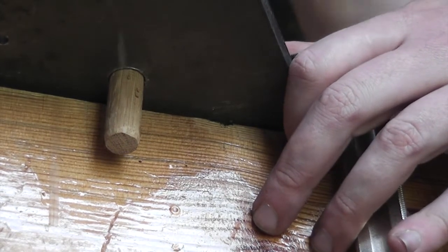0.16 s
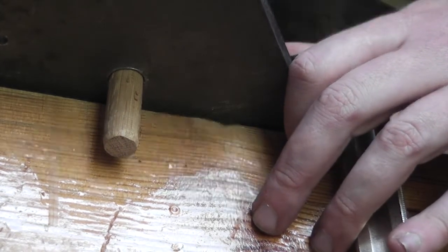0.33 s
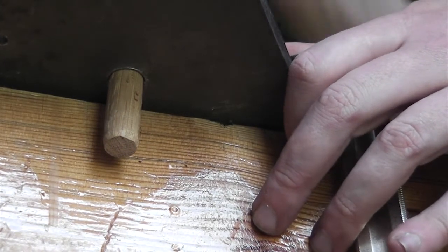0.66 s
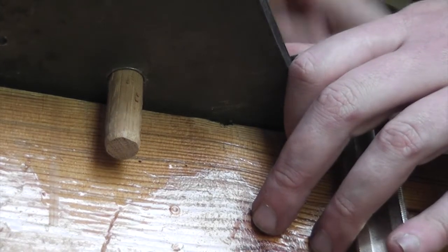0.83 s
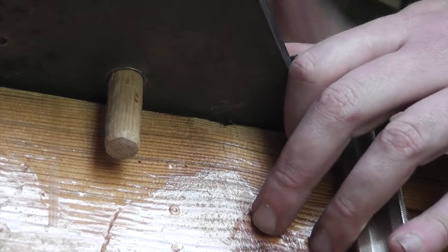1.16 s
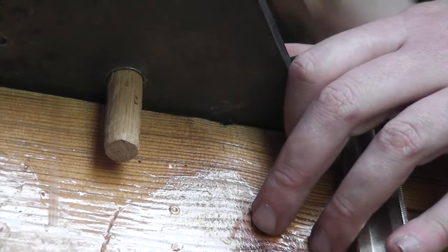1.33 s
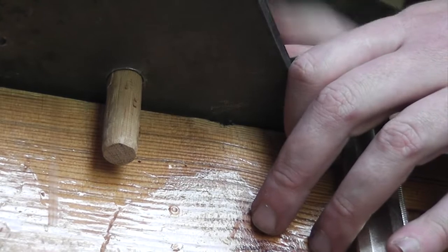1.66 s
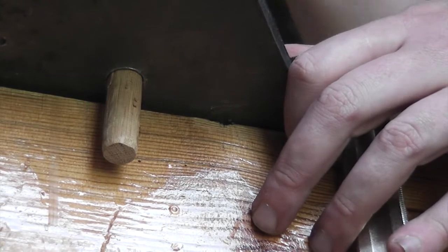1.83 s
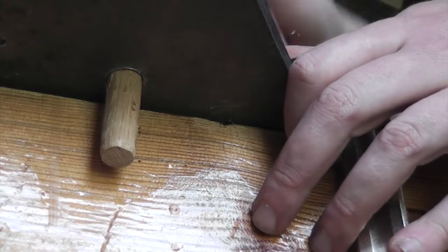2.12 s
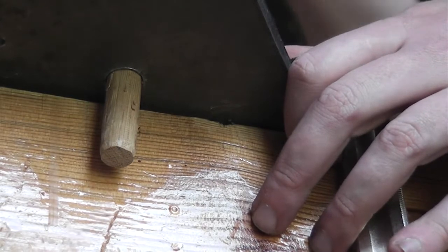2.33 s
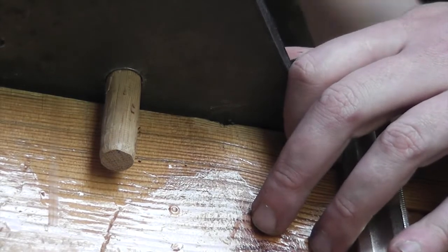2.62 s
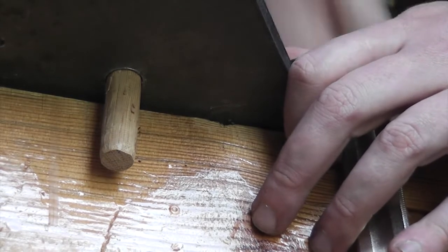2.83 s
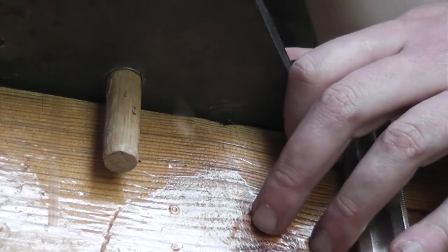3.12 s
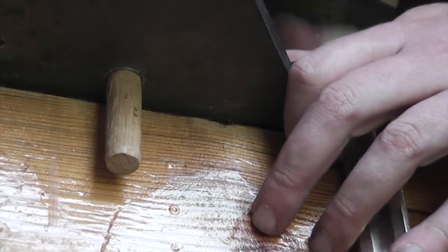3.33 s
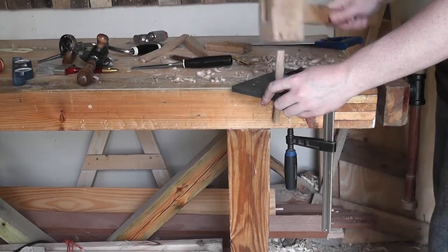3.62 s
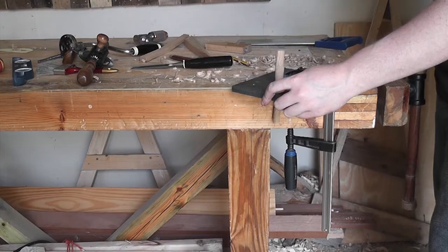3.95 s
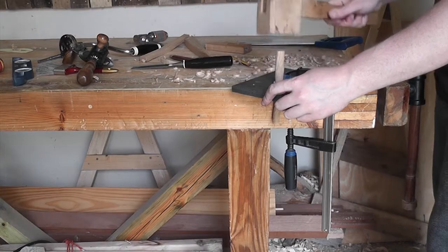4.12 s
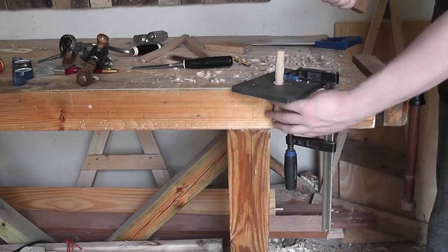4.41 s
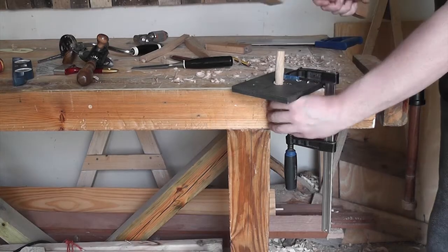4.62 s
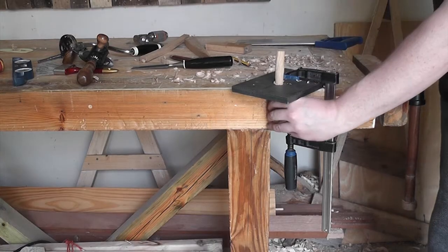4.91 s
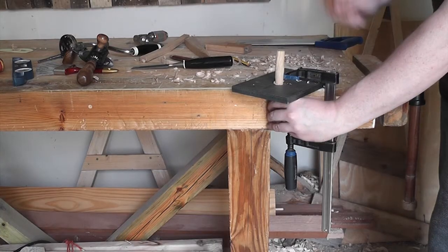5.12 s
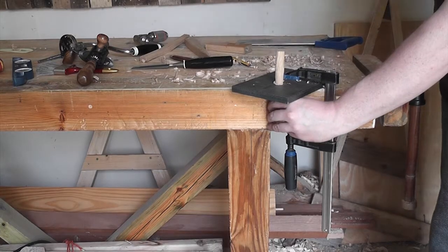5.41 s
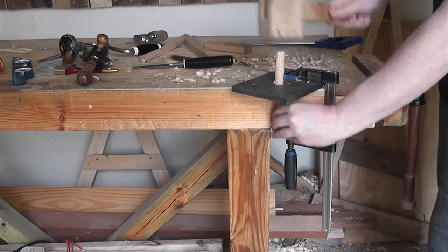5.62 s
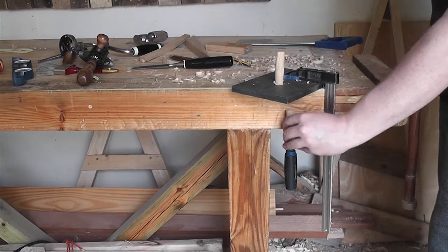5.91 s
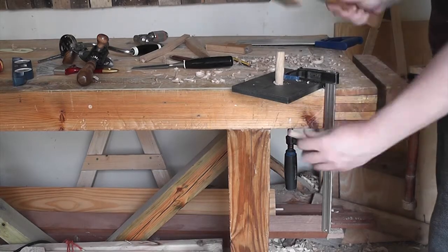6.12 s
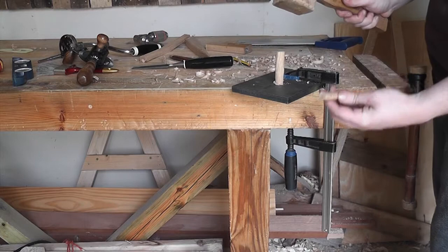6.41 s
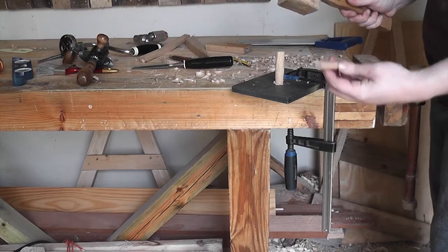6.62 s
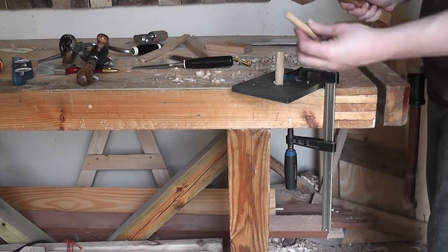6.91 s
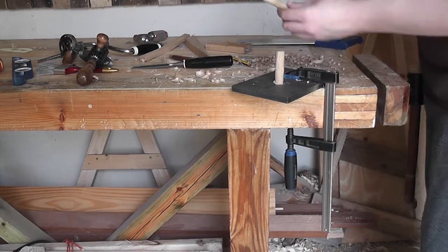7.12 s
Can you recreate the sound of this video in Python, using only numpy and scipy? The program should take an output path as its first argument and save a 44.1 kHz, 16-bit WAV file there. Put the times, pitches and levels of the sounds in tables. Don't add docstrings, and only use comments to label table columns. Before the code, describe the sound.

Close to the bench, a wooden mallet hits a peg through a steel plate about every 0.43 seconds: sharp fibre crack, metallic ping, low bench thump, short boxy room tail. Midway the sound jumps to a farther, roomier position for two bright blows, then a pause with small ticks and handling, two more blows with the steel damped by a hand, and soft rustles over faint traffic hum.

```python
import sys
import numpy as np
from scipy import signal
from scipy.fft import rfft, irfft, next_fast_len
from scipy.io import wavfile

SR = 44100
rng = np.random.default_rng(int(sys.argv[2]) if len(sys.argv) > 2 else 0)


def boost(x):
    u = np.asarray(x, float) / 20
    return 10 ** u


def file_out(sig):
    cols = np.atleast_2d(sig).T
    lim = np.clip(cols, -1, 1)
    pcm = np.round(lim * 32767).astype(np.int16)
    wavfile.write(sys.argv[1], SR, pcm)


N = 320607
LEAD = SR // 10
CHANGE_S = 3.479
NEAR_EARLIER_S, FAR_EARLIER_S = -0.055, 3.17


def rms_one(x):
    return x / np.sqrt(np.mean(x ** 2) + 1e-20)


def at_hz(points, hz):
    table_hz, value = np.transpose(points)
    return np.interp(np.log(hz), np.log(table_hz), value)


def ring(clicks, hz, t60):
    radius = boost(-60 / (t60 * SR))
    angle = 2 * np.pi * hz / SR
    return signal.lfilter([0, np.sin(angle)], [1, -2 * radius * np.cos(angle), radius ** 2], clicks + 1e-18)


def stereo_noise(size, spectrum, likeness):
    hz = np.arange(1, size // 2 + 2) * SR / size
    alike = np.clip(at_hz(likeness, hz), 0, 1)
    mid, side = rfft(rng.standard_normal((2, size))) * boost(at_hz(spectrum, hz))
    return hz, np.sqrt(1 + alike) * mid + np.sqrt(1 - alike) * side * [[1], [-1]]


HOLD_S, CREEP_DB_S = 0.31, 15.5
PULL_SHARE = 0.46


def gain_corners(start_s, gain_db, pulls):
    corners = [(start_s, gain_db)]
    free_s = start_s + HOLD_S
    for s, bottom_db in pulls:
        full_s = free_s - gain_db / CREEP_DB_S
        before_db = min(gain_db + CREEP_DB_S * max(s - free_s, 0), 0)
        corners += [(min(free_s, s), gain_db), (min(full_s, s), before_db), (s, before_db)]
        gain_db = before_db - PULL_SHARE * (before_db - bottom_db)
        free_s = s + HOLD_S
    return np.interp(np.arange(N) / SR, *np.transpose(corners))


def slow_gain():
    end = [(N / SR, 0)]
    near_pulls = [(row[0], -23.5) for row in NEAR_BLOWS]
    far_pulls = [(row[0], -19) for row in FAR_BLOWS]
    last_far_pulls = [(row[0], -13.5) for row in LAST_FAR_BLOWS]
    near = gain_corners(NEAR_EARLIER_S, -15, near_pulls + end)
    far = gain_corners(FAR_EARLIER_S, -13.5, far_pulls + last_far_pulls + end)
    return np.where(np.arange(N) / SR < CHANGE_S, near, far)


def building_rumble():
    t = np.arange(N) / SR
    near = [NEAR_EARLIER_S] + [row[0] for row in NEAR_BLOWS]
    far = [FAR_EARLIER_S] + [row[0] for row in FAR_BLOWS + LAST_FAR_BLOWS]

    def latest(s):
        return np.array(s)[np.maximum(np.searchsorted(s, t) - 1, 0)]
    since_s = t - np.where(t < CHANGE_S, latest(near), latest(far))
    return boost(-39.5 - 60 * since_s / 0.58)


# frequency in Hz, level in dB per Hz.
HUM = [(18, -45), (30, -4.5), (52, -7.5), (93, 1.5), (125, -4), (202, -1), (417, -6.5), (900, -4),
       (2470, -17), (5660, -21.5), (10600, -31.5), (12000, -29.5), (15600, -40), (22000, -120)]
# frequency in Hz, left-right likeness from 0 to 1.
HUM_LIKENESS = [(60, 0.57), (170, 1), (500, 0.83), (1000, 0.83), (1800, 1), (12300, 1)]


def ambience():
    gain_db = slow_gain()
    size = next_fast_len(N)
    hz, pair = stereo_noise(size, HUM, HUM_LIKENESS)
    pair = pair * boost([[-0.7], [0.7]])
    low_share = 1 / (1 + (hz / 2200) ** 3)
    traffic = rms_one(irfft(pair * low_share, size)[:, :N])
    hiss = rms_one(irfft(pair * (1 - low_share), size)[:, :N])
    return (boost(-43.5 + gain_db) + building_rumble()) * traffic + boost(-53 + 1.27 * gain_db) * hiss


# start in seconds, level in dB, centre in Hz,
# bandwidth in Hz, decay length in seconds.
SMALL_SOUNDS = [(.223, -66, 9360, 2022, .003), (0.527, -47, 6000, 7000, 0.027),
                (1.062, -61, 8850, 1500, .004), (1.519, -70, 9770, 1000, 0.0027),
                (1.563, -75, 10700, 1490, .003), (4.063, -42.5, 553, 800, 0.0051),
                (4.453, -62.5, 6000, 450, 0.04), (4.452, -65.5, 8500, 5030, .006),
                (4.67, -59.5, 6060, 498, 0.014), (4.742, -58, 7500, 8000, 0.015),
                (4.693, -65.5, 2700, 160, 0.24), (4.754, -54, 2370, 300, 0.02),
                (4.939, -48.5, 2980, 1200, 0.07), (5.967, -60, 10500, 3000, .004),
                (6.317, -50.5, 6000, 1500, 0.054), (6.5, -47, 5500, 3000, 0.016)]


def small_sounds():
    out = np.zeros(N)
    t = np.arange(LEAD * 2) / SR
    for s, level_db, hz, width_hz, length_s in SMALL_SOUNDS:
        edges = np.clip([hz - width_hz / 2, hz + width_hz / 2], 100, 15000)
        resonance = signal.butter(2, edges, "band", fs=SR, output="sos")
        puff = rms_one(signal.sosfilt(resonance, rng.standard_normal(len(t))))
        rise_s = 0.00092 + 0.083 * length_s
        start = round(s * SR)
        out[start:start + len(t)] += boost(level_db) * puff * np.exp(-t / length_s) * (1 - np.exp(-t / rise_s))
    return out


def mode_tail(modes, t, build_s, longest_s):
    out = 0
    for hz, level_db, t60 in modes:
        phase = rng.uniform(0, 2 * np.pi) + rng.normal(0, 0.15, (2, 1))
        decay = boost(level_db - 60 * t / min(t60, longest_s))
        out = out + decay * np.sin(2 * np.pi * hz * t + phase)
    return rms_one(out * (1 - np.exp(-t / build_s)))


# frequency in Hz, t60 in seconds.
ROOM_T60 = [(60, 0.33), (190, .25), (320, 0.33), (600, 0.29), (1500, 0.31), (4000, 0.29), (10000, 0.23)]
# frequency in Hz, rise time in seconds.
ROOM_RISE = [(200, 0.00043), (350, 0.0098), (600, 0.033), (1000, 0.015), (2000, 0.0039), (5000, 0.00061)]
# frequency in Hz, left-right likeness from 0 to 1.
ROOM_LIKENESS = [(60, 0.95), (170, 1), (500, 0.73), (2000, 0.8), (2900, 1), (4100, 0.98), (4900, .9995),
                 (11500, 0.97)]


def diffuse_room(spectrum, t):
    hz, pair = stereo_noise(len(t), spectrum, ROOM_LIKENESS)
    out = 0
    for centre in 28 * 2 ** np.arange(0, 9.1, 0.5):
        overlap = np.clip(1 - 2 * np.abs(np.log2(hz / centre)), 0, 1)
        build = 1 - np.exp(-t / at_hz(ROOM_RISE, centre))
        decay = boost(-60 * t / at_hz(ROOM_T60, centre))
        out = out + build * decay * irfft(pair * overlap, len(t))
    return rms_one(out)


# frequency in Hz, level in dB per Hz.
NEAR_ROOM = [(30, -43), (55, -31), (95, -16), (150, -18.5), (215, -10.5), (300, -8), (520, -4.5),
             (750, -7.5), (1200, -14.5), (2500, -22), (4100, -22.5), (8700, -28), (12000, -38.5),
             (15600, -66.5)]
FAR_ROOM = [(30, -62), (55, -45.5), (130, -20), (250, -9.5), (330, -10.5), (520, -1.5), (750, -3.5),
            (1100, -13.5), (1800, -15), (2500, -26), (3800, -17), (6000, -20), (12000, -38), (15600, -75.5)]
# frequency in Hz, level in dB, t60 in seconds.
NEAR_LOWS = [(167.5, -9.5, 0.23), (290, -8, 0.11), (322, 1.5, 0.28), (452.8, -2.5, 0.2), (510, -4.5, 0.3),
             (574.5, -4.5, 0.19), (392.6, -3.5, 0.21), (695, -1.5, .25), (624, 3.5, 0.21),
             (854, -9.5, 0.14), (829, 1, 0.18), (979, -3.5, 0.22), (1039, -34, 0.15)]
FAR_LOWS = [(147.2, -15, 0.28), (259, -4, 0.336), (379.4, -0.5, 1.5), (513.4, -1, 0.34), (644, -6, 0.3),
            (405.6, -2.5, .3), (576, -2, 0.3), (344.3, -5.5, 0.42), (1002, -9.5, 0.34), (1061, -18.5, 0.79)]
# frequency in Hz, level in dB, t60 in seconds.
NEAR_HIGHS = [(1565, 3, .3), (1870, -8, .3), (2120, -5, .3), (2617, -8, .3), (3840, -8, .25),
              (4135, -4, .22), (4660, -7, .25), (5960, -11, .25), (6820, -10, .25), (8580, -13, .2),
              (9640, -12, .15)]
FAR_HIGHS = [(1940, -6, .3), (2617, -8, .35), (3600, 0, .35), (4090, 5, .4), (4690, -3, .3),
             (5200, -6, .28), (5900, -3, .25), (8550, -10, .2), (9700, -14, .2)]


def room_answer(spectrum, lows, highs, lows_db, highs_db):
    t = np.arange(2 ** 15) / SR
    low_modes = boost(lows_db) * mode_tail(lows, t, build_s=0.02, longest_s=0.35)
    high_modes = boost(highs_db) * mode_tail(highs, t, build_s=0.00053, longest_s=0.29)
    return (diffuse_room(spectrum, t) + low_modes + high_modes) / np.sqrt(len(t))


# frequency in Hz, level in dB, t60 in seconds.
THUMP = [(70, -8, 0.011), (120, -4.5, 0.026), (194, -2.5, 0.057)]


def bench_thump(train, thump_db):
    thump = 0
    for hz, level_db, t60 in THUMP:
        thump = thump + ring(train(thump_db + level_db, round(0.00091 * SR)), hz, t60)
    right = boost(1.4) * np.roll(thump, round(0.0025 * SR))
    return -np.array([thump, right])


# frequency in Hz, level in dB, t60 in seconds.
NEAR_STEEL = [(705, -48, 3), (1367, -60, 3), (1453, -63, 3), (1658, -65, 1.5), (490, -56, 1.5)]
FAR_STEEL = [(1367, -50, 4), (1453, -51, 4), (2584, -60, 1.5)]


def steel_ring(train, steel, steel_db):
    return sum(ring(train(level_db + steel_db), hz, t60) for hz, level_db, t60 in steel)


# frequency in Hz, level in dB, t60 in seconds.
NEAR_BODY = [(1636, -10.5, .025), (800, -9, 0.016), (2700, -14, 0.0027), (3320, -13, 0.012),
             (4810, -8, 0.008), (6000, -19.5, .015), (6760, -15, 0.018), (8860, -14.5, 0.013),
             (12700, -11.5, 0.00095)]
FAR_BODY = [(1000, -5, 0.015), (2120, -13.5, 0.09), (3440, -12, 0.011), (4830, -14, 0.026),
            (6000, -5, 0.0072), (8960, -9.5, 0.0034), (9600, -19.5, 0.0047), (10250, -2.5, 0.003)]


def body_modes(train, crack, body, count):
    out = 0
    for k, (hz, level_db, t60) in enumerate(body):
        lag = np.abs(30 * rng.standard_normal(count)).astype(int)
        shock = train(level_db + 0.7 * rng.standard_normal(count), lag)
        out = out + ring(shock + boost(level_db - 19.5) * crack, hz, t60) * (-1) ** k
    return out


def plate_ping(train, ping_db):
    ping_hz = 4105
    contact = np.hanning(90) * np.sin(2 * np.pi * ping_hz * np.arange(90) / SR) / 22
    ping = ring(np.convolve(train(ping_db), contact)[:N + LEAD], ping_hz, 0.024)
    return ping + ring(train(ping_db - 17), 4096, 0.13)


def fibre_crack(at, gains):
    t = np.arange(250) / SR
    swell = np.exp(-t / 0.0011) * (1 - np.exp(-t / 0.00044))
    crack = np.zeros(N + LEAD)
    for i, gain in zip(at, gains):
        crack[i:i + 250] += gain * swell * rng.standard_normal(250)
    return crack


# start in seconds, strength in dB, treble crack in dB, bench thump in dB, long steel ring in dB.
NEAR_BLOWS = [
    (0.369, -5, -15, -28, -6),
    (0.797, -4, -18.5, -29, -3),
    (1.226, -3, -18.5, -35, -9),
    (1.652, -4, -18.5, -29.5, 2),
    (2.069, -4, -16.5, -28, -8),
    (2.491, -6, -14.5, -27, -3),
    (2.926, -6, -15, -27.5, -7),
    (3.35, -4.5, -15, -30.5, -2),
]
FAR_BLOWS = [
    (3.644, -8, -11.5, -26.5, -3),
    (4.092, -7.5, -13, -34.5, -16),
]
LAST_FAR_BLOWS = [
    (5.201, -4.5, -18.5, -36, -6),
    (5.635, -5.5, -13, -37.5, -11),
]


def mallet_blows(rows, body, steel, room, room_db, echo_db, ping_db, thump_db, bounce_s, bounce_db):
    s, strength_db, crack_db, bench_db, steel_db = np.transpose(rows)
    treble_db = crack_db - np.median(crack_db)
    bench_db = bench_db - np.median(bench_db)
    more_ping_db = -1.6 * (strength_db - np.median(strength_db))
    at = np.round((s + 0.00056) * SR).astype(int) + LEAD

    def train(db, lag=0):
        clicks = np.zeros(N + LEAD)
        clicks[at + lag] = boost(strength_db + db)
        return clicks

    def soften(clicks):
        return signal.lfilter([0.3], [1, -0.7], clicks)

    crack = fibre_crack(at, boost(strength_db + treble_db))
    ping = plate_ping(train, ping_db + more_ping_db)
    direct = ping + body_modes(train, crack, body, len(rows)) + boost(-4.5) * crack
    direct = direct + boost(bounce_db) * np.roll(direct, round(bounce_s * SR))
    direct = direct * boost([[0.33], [-0.33]])
    treble = train(treble_db) - soften(train(treble_db))
    feed = boost(room_db) * (soften(train(0)) + treble + boost(-21) * crack) + boost(echo_db) * ping
    wet = signal.oaconvolve(feed[None], room, axes=1)[:, :N + LEAD]
    thump = bench_thump(train, thump_db + bench_db)
    return (direct + steel_ring(train, steel, steel_db) + thump + wet)[:, LEAD:]


def scene():
    near_room = room_answer(NEAR_ROOM, NEAR_LOWS, NEAR_HIGHS, lows_db=-4.5, highs_db=-14.0)
    far_room = room_answer(FAR_ROOM, FAR_LOWS, FAR_HIGHS, lows_db=-5.5, highs_db=-14.0)
    near_rows = [(NEAR_EARLIER_S, -4.5, -16.5, -24, -2.5), *NEAR_BLOWS]
    far_rows = [(FAR_EARLIER_S, -2, -12, -27, -2), *FAR_BLOWS, *LAST_FAR_BLOWS]
    near = mallet_blows(near_rows, NEAR_BODY, NEAR_STEEL, near_room, room_db=23, echo_db=-6.0,
                        ping_db=-1.0, thump_db=-10.5, bounce_s=0.0032, bounce_db=-6.5)
    far = mallet_blows(far_rows, FAR_BODY, FAR_STEEL, far_room, room_db=29, echo_db=0.0,
                       ping_db=-7.5, thump_db=-15.5, bounce_s=0.0026, bounce_db=-4.5)
    changed = np.clip((np.arange(N) / SR - CHANGE_S) / 0.0016, 0, 1)
    return (1 - changed) * near + changed * far + small_sounds() + ambience()


def top_cut(x):
    return signal.sosfilt(signal.butter(12, 12920, fs=SR, output="sos"), x)


def record(dry):
    limit_db, release_db_s, attack_s = -7, 62.5, 0.0036
    over_db = np.maximum(20 * np.log10(np.abs(dry).max(axis=0) + 1e-9) - limit_db, 0)
    ramp_db = release_db_s * np.arange(N) / SR
    held_db = np.maximum.accumulate(over_db + ramp_db) - ramp_db
    pole = np.exp(-1 / (attack_s * SR))
    limited = dry * boost(-signal.lfilter([1 - pole], [1, -pole], held_db))
    limited = signal.sosfilt(signal.butter(2, 45.0, "high", fs=SR, output="sos"), limited)
    soft = 0.95 * np.tanh(limited / 0.95)
    mix = signal.sosfilt(signal.cheby2(20, 55, 12120, fs=SR, output="sos"), soft)
    return top_cut(mix)


dry = scene()
out = record(dry)
file_out(out)
```